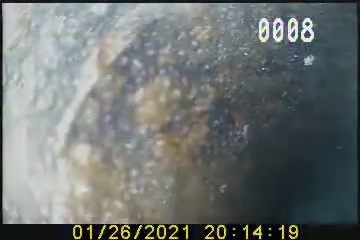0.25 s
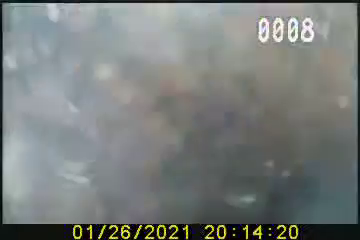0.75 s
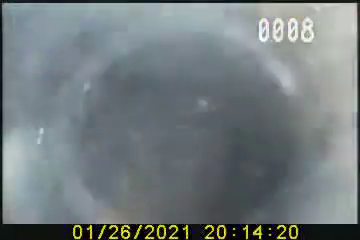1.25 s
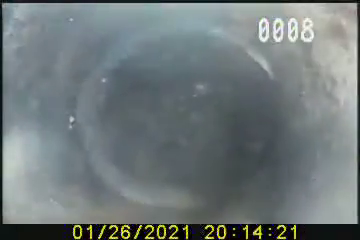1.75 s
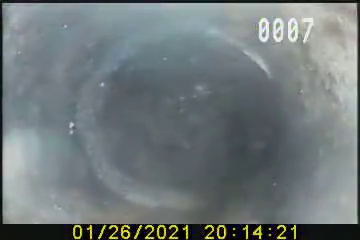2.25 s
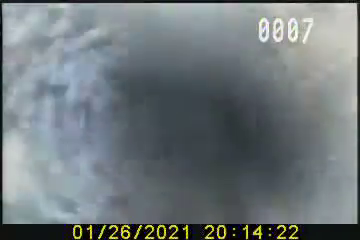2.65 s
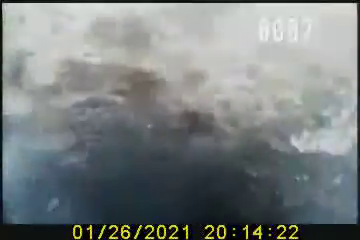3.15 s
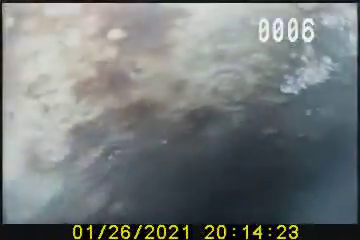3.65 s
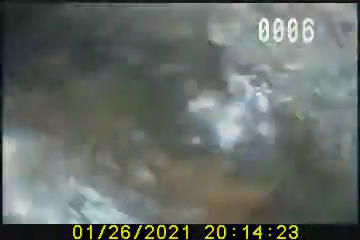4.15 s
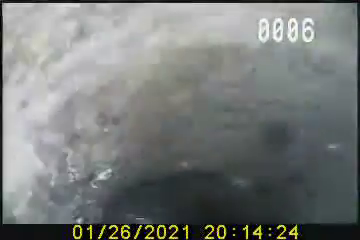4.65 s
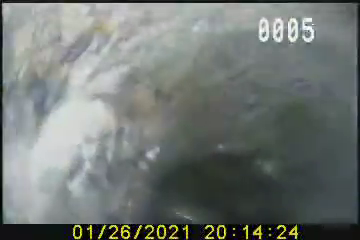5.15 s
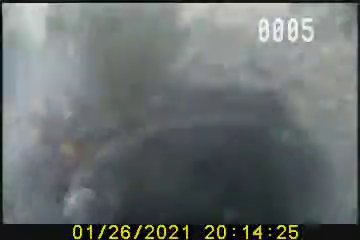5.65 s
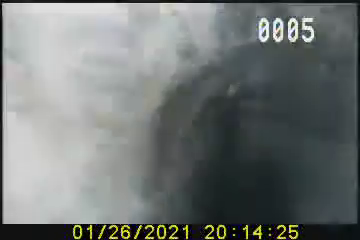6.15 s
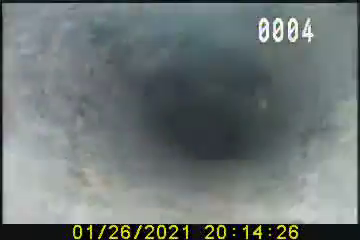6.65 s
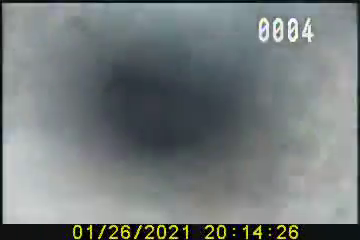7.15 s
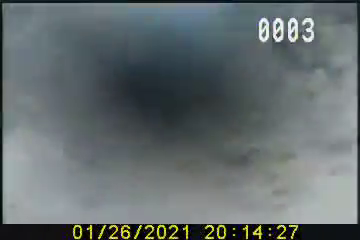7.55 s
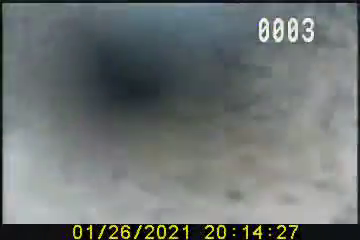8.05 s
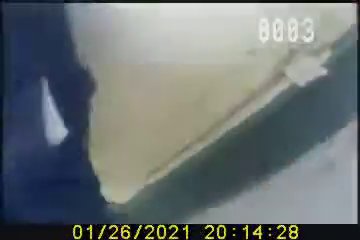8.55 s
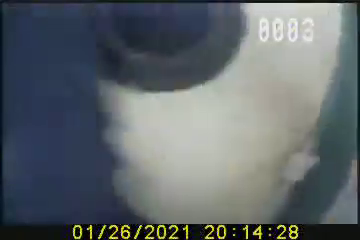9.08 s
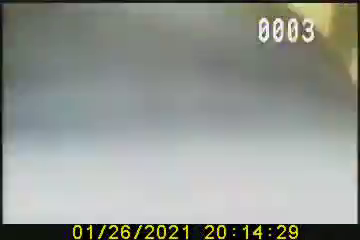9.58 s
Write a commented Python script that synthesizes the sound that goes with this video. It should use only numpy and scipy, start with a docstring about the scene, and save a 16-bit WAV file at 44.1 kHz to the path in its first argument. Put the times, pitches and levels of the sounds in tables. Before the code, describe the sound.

A high, thin electronic whine from a pipe inspection camera is present from the start and stays in front for the whole ten seconds or so. It has a fast, buzzy flutter, and its pitch sinks very slightly over time. About every 0.6 seconds it flicks up in a tiny raspy chirp, sags a little and recovers. The chirps grow rougher from around 2.5 seconds. Brief gritty sputters roughen the tone near 3.6, 4.1, 6.7 and 8.3 seconds, with three close together around 9.5 seconds. Underneath, a softer, even hiss continues along with a fine, irregular electrical crackle. Slightly sharper ticks stand out here and there, such as near 0.3, 4, 8.7 and 9.7 seconds. The overall level holds steady. Everything is mono and completely dry, the noise of the electronics alone, with the highest treble cut off.

```python
"""Inside a pipe, an inspection camera is drawn back; its sound channel picks up only its own electronics.
Up front an oscillator whines near 2.2 kHz, its pitch following every disturbance of its supply:
it sinks slowly, flutters with every video frame and chirps up with a rasp about every 0.6 s.
Under it lie a fine crackle of voltage spikes and a bed of amplifier hiss, all bone dry."""
import sys
import numpy as np
from scipy.fft import rfft, irfft, next_fast_len
from scipy.io import wavfile
from scipy.ndimage import map_coordinates

SR = 44100
rng = np.random.default_rng(int(sys.argv[2]) if len(sys.argv) > 2 else 0)


def bounce(signal):
    """Save signal as a 16-bit WAV file at the path given by the first command-line argument."""
    frames = np.transpose(np.atleast_2d(signal))
    limited = np.clip(frames, -1, 1)
    pcm = np.round(limited * 32767).astype(np.int16)
    wavfile.write(sys.argv[1], SR, pcm)


N = 433062
TIME = np.arange(N) / SR
FRAME_HZ, RIPPLE_HZ = 29.97, 199.76

# The whine's tone colour, from its lopsided wave: (harmonic [number], peak level [dB])
WHINE_HARMONICS = [(1, -23), (2, -37), (3, -46)]

def whine(frame, flutter_hz, ripple_depth_hz, jitter_hz, shiver_hz, wander_hz, unrest_db):
    """The lead: a free-running oscillator whose pitch follows every disturbance of its supply."""
    start_hz, sink_hz_per_s = 2251, 5.9
    bend, rasp = chirps_and_sputters()
    pitch = start_hz - sink_hz_per_s * TIME + bend - bend.mean()
    pitch += flutter_hz * (frame - frame.mean())
    pitch += ripple_depth_hz * np.sin(2 * np.pi * RIPPLE_HZ * TIME)
    # supply noise kicks the pitch upward in fits, hardest during a chirp or sputter
    roughness = (1 + rasp) * amp(unrest_db * wobble(rate=70, skew=.5))
    kicks = jitter_hz * wobble(rate=1900, skew=1.7) + shiver_hz * wobble(rate=620, skew=2.3)
    pitch += roughness * kicks
    pitch += wander_hz * wobble(rate=45, skew=0.593)
    phase = 2 * np.pi * np.cumsum(pitch) / SR
    return sum(amp(db) * np.cos(harmonic * phase) for harmonic, db in WHINE_HARMONICS)


# Short, raspy upward flicks of the whine: (time [s], pitch rise [Hz], extra roughness [x usual])
CHIRP_CUES = [(0.064, 38, .7), (0.529, 28.96, .7), (1.264, 27, .3), (1.966, 51.8, .9), (2.563, 43.6, 1.6),
              (3.233, 41.7, 1.4), (3.798, 50.1, 1.3), (4.363, 52, 1.6), (4.963, 43, .9), (5.498, 41.7, .8),
              (5.963, 47.8, 2.0), (6.564, 38, 1.2), (7.123, 49.4, 1.6), (7.726, 44.8, 1.4),
              (8.226, 41.9, 1.5), (8.854, 40.9, 1.3), (9.557, 54.8, 1.9)]
# Sputters, where the whine turns gritty with hardly any rise: (time [s])
SPUTTER_CUES = [3.572, 4.057, 6.708, 8.319, 9.460, 9.632, 9.724]

def chirps_and_sputters(chirp_s=.025, recoil_hz=13, recover_s=.42, sputter_rise_hz=14, sputter_rasp=1.5):
    """Accents on the whine: the pitch bend (Hz) and extra roughness of its chirps and sputters."""
    times, rises, rasps = np.transpose(CHIRP_CUES)
    # after each chirp the pitch sags, then climbs back
    recoil = sum(np.interp(TIME - s, [0, chirp_s / 2, recover_s], [0, 1, 0]) for s in times)
    sputter = bumps(SPUTTER_CUES, heights=1, length_s=.02)
    bend = bumps(times, rises, chirp_s) - recoil_hz * recoil + sputter_rise_hz * sputter
    rasp = bumps(times, rasps, chirp_s) + sputter_rasp * sputter
    return bend, rasp


# The ticks that stand out, all downward voltage spikes: (time [s], peak level after the filter [dB])
TICK_CUES = [(0.2375, -19.5), (0.2967, -15), (0.3295, -16), (0.5112, -19), (1.1928, -19), (1.3923, -17.5),
             (2.159, -19.5), (3.8299, -16), (4.0914, -15), (4.1781, -17.5), (4.236, -20.5), (4.3918, -17.5),
             (4.7609, -18.5), (5.0973, -17.5), (5.325, -19), (6.6754, -17.5), (7.6846, -18), (8.1755, -18),
             (8.5312, -18.5), (8.7043, -15.5), (9.0926, -17), (9.7464, -15.5)]

def crackle(frame, bunching, fits_db):
    """Voltage spikes of both signs come in fits, crowding the part of each frame where the whine is low."""
    density = (1 + bunching * (1 - frame)) * amp(fits_db * wobble(rate=110, skew=.6))
    density /= density.mean()
    upward = random_spikes(rate=95 * density, top_db=-24.5, taper=1.3)
    downward = random_spikes(rate=66 * density, top_db=-19.0, taper=1.56)
    spikes = upward - downward
    for s, db in TICK_CUES:
        spikes[round(s * SR)] -= amp(db)
    # make-up gain: the input filter smears each spike, leaving this share of its peak
    peak_share = np.mean(passband_gain(np.linspace(0, SR / 2, 512)))
    return spikes / peak_share


def random_spikes(rate, top_db, taper):
    """The crackle's grain: one-sample clicks, about rate a second; more taper makes more of them small."""
    fires = rng.random(N) < rate / SR
    return fires * amp(top_db) * rng.random(N) ** taper


def hiss(level_db):
    """The bed: steady white noise from the input amplifier."""
    return amp(level_db) * rng.standard_normal(N)


def frame_gate(centre, share):
    offset = (TIME * FRAME_HZ - centre + .5) % 1 - .5
    return 1.0 * (np.abs(offset) < share / 2)


def bumps(times, heights, length_s):
    """A flat-topped envelope of the given length around each cue."""
    envelope = np.zeros(N + SR)
    t = np.arange(-SR // 20, SR // 20) / SR
    shape = np.exp(-(2 * t / length_s) ** 4)
    for s, height in zip(times, np.broadcast_to(heights, len(times))):
        start = max(0, round((s + t[0]) * SR))
        envelope[start:start + len(t)] += height * shape
    return envelope[:N]


def wobble(rate, skew):
    """A smooth random modulator of spread near 1, with rate knots a second, leaning to upward peaks."""
    shape = (2 / skew) ** 2
    knots = (rng.gamma(shape, size=int(N * rate / SR) + 4) - shape) / np.sqrt(shape)
    return map_coordinates(knots, [TIME * rate], mode="nearest")


def amp(db):
    """Decibels to gain."""
    return 10 ** (np.asarray(db) / 20)


def scene():
    """The mono mix: whine, crackle and hiss add on one wire, with no room around them."""
    frame = frame_gate(centre=.45, share=.46)
    lead = whine(frame, flutter_hz=25.8, ripple_depth_hz=10.1, jitter_hz=22.7, shiver_hz=10.5,
                 wander_hz=4, unrest_db=2.0)
    return (lead + crackle(frame, bunching=1.3, fits_db=4) + hiss(level_db=-40.0))[None]


INPUT_EQ = [(20, 1), (4000, 0), (7000, -0.43), (7600, -2.5), (8000, -6), (8400, -14.5), (8750, -26),
            (9100, -42.5)]

def passband_gain(hz):
    """How much of each frequency the input lets through, its EQ drawn on a log frequency axis."""
    points_hz, points_db = np.transpose(INPUT_EQ)
    return amp(np.interp(np.log(hz + 1), np.log(points_hz), points_db))


def record(dry, top_hz=9240):
    """The input's anti-alias filter rounds off the treble and passes nothing above its limit."""
    padded = next_fast_len(N + SR // 2)
    hz = np.fft.rfftfreq(padded, 1 / SR)
    spectrum = rfft(dry, padded) * passband_gain(hz) * (hz < top_hz)
    return irfft(spectrum, padded)[..., :N]


dry = scene()
out = record(dry)
bounce(out)
```